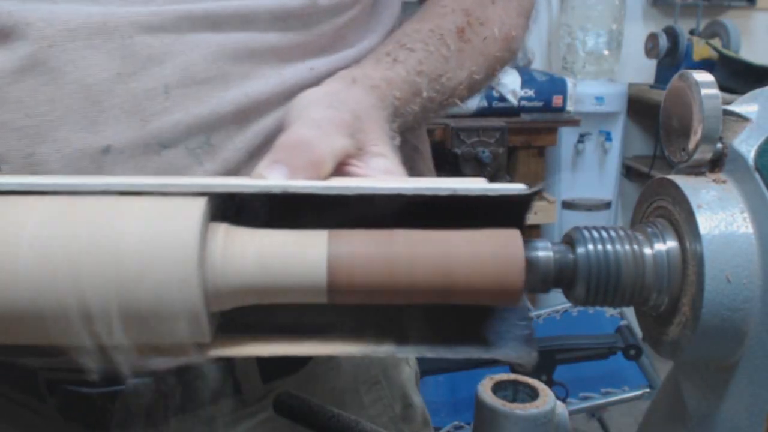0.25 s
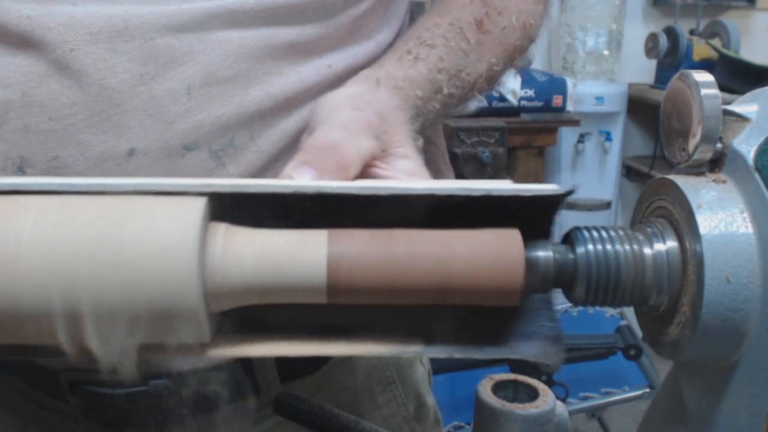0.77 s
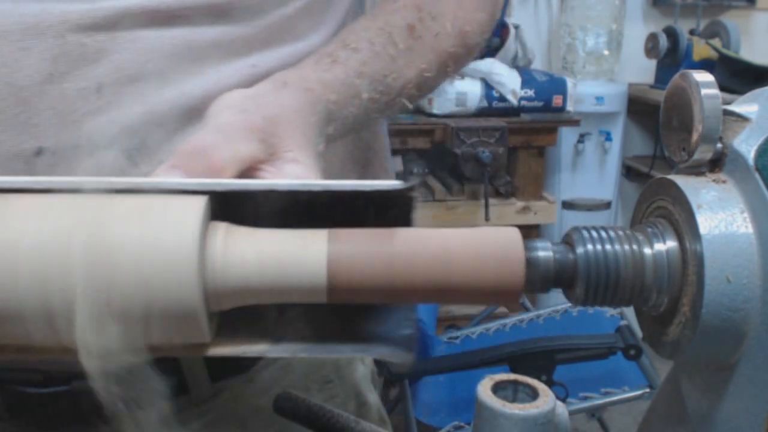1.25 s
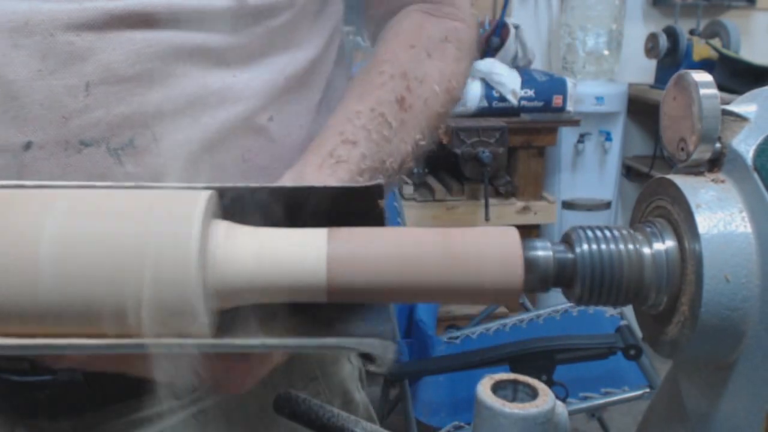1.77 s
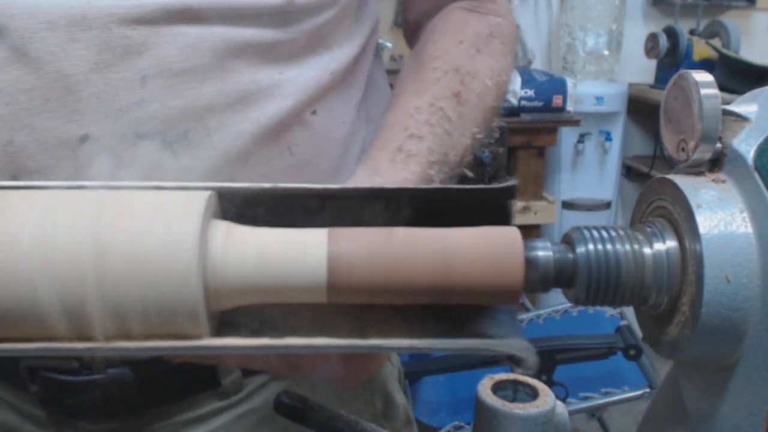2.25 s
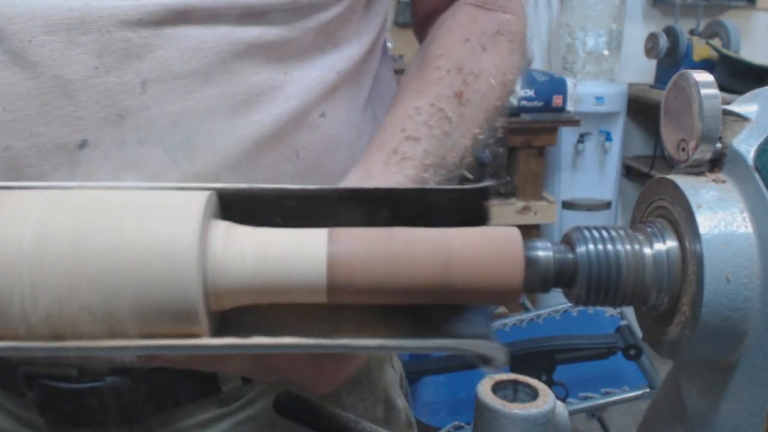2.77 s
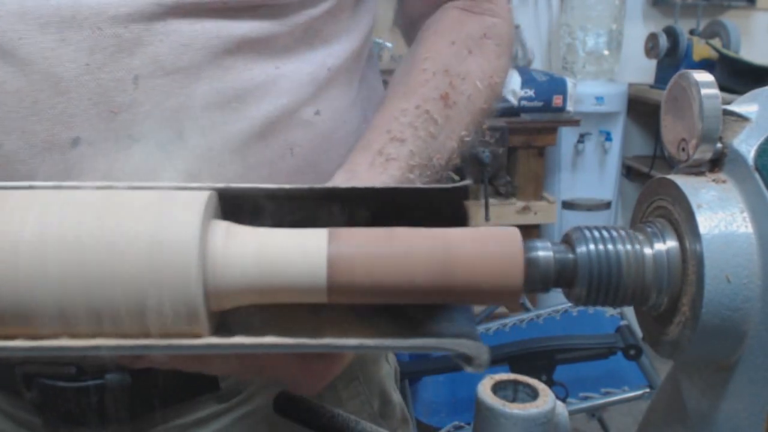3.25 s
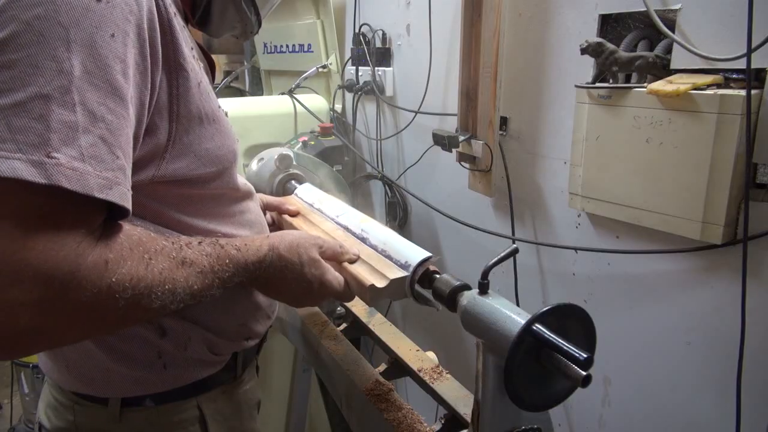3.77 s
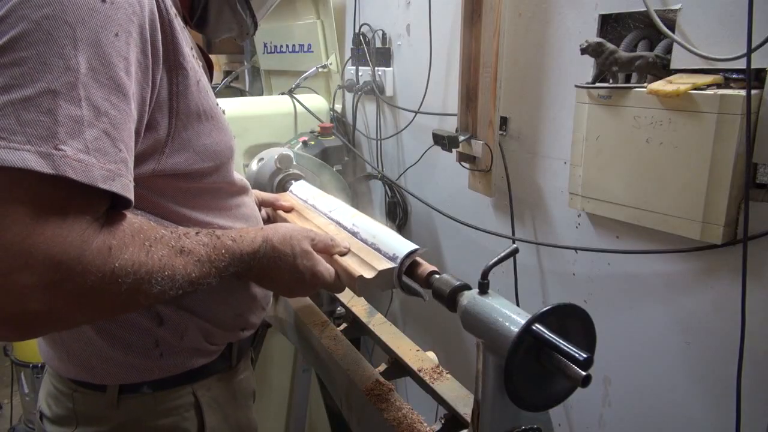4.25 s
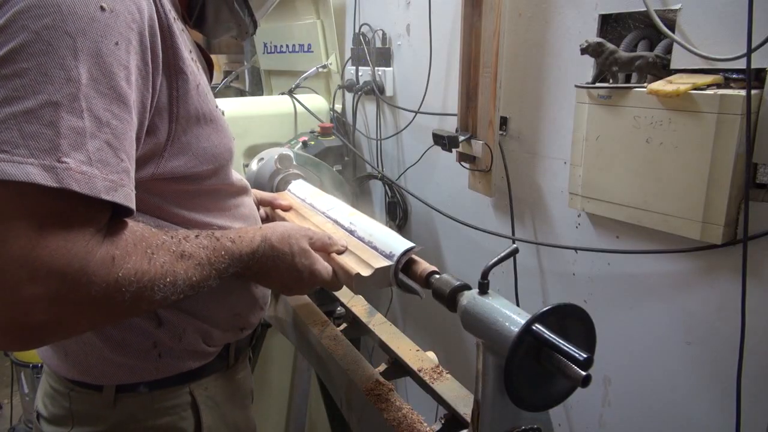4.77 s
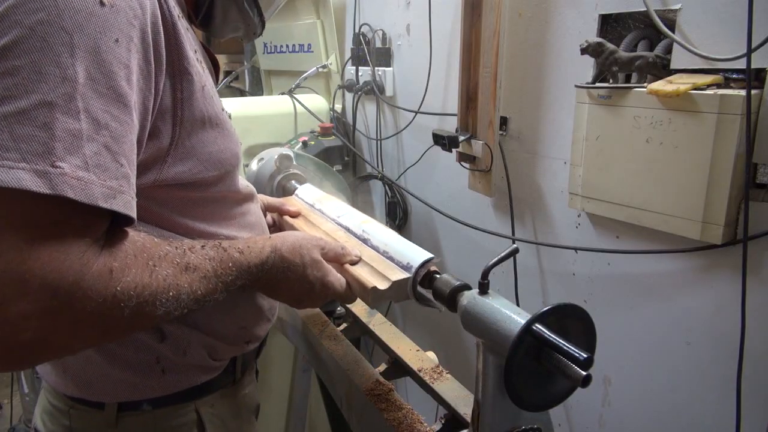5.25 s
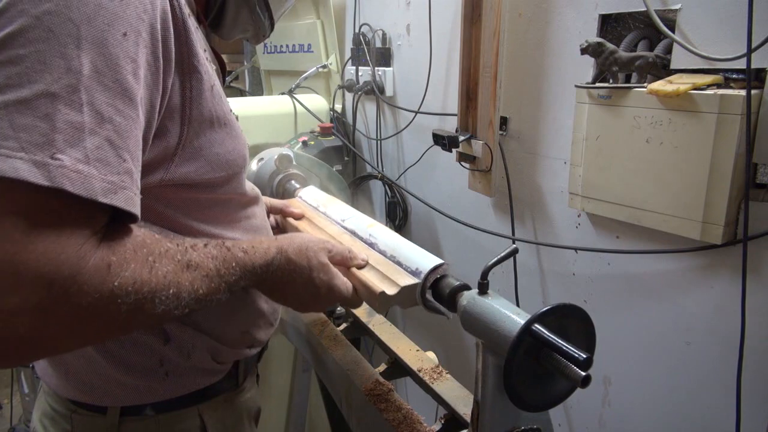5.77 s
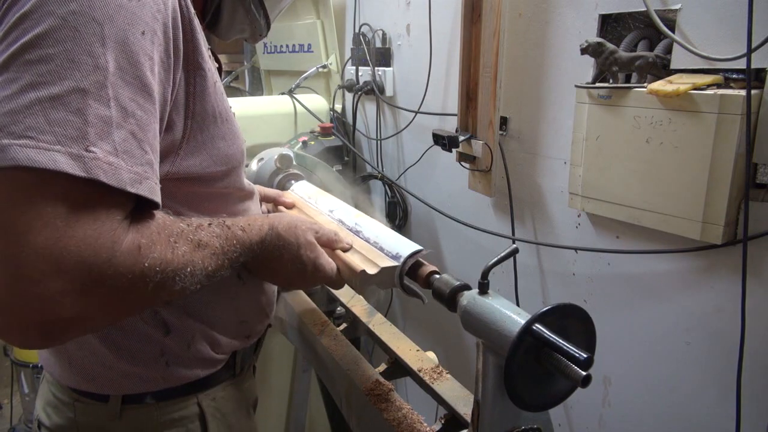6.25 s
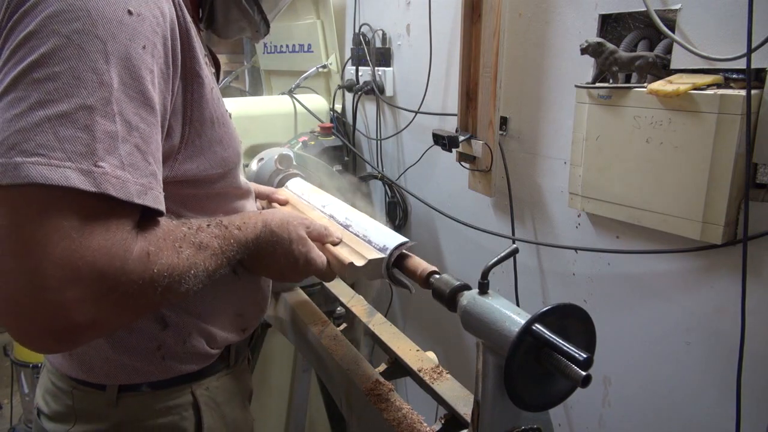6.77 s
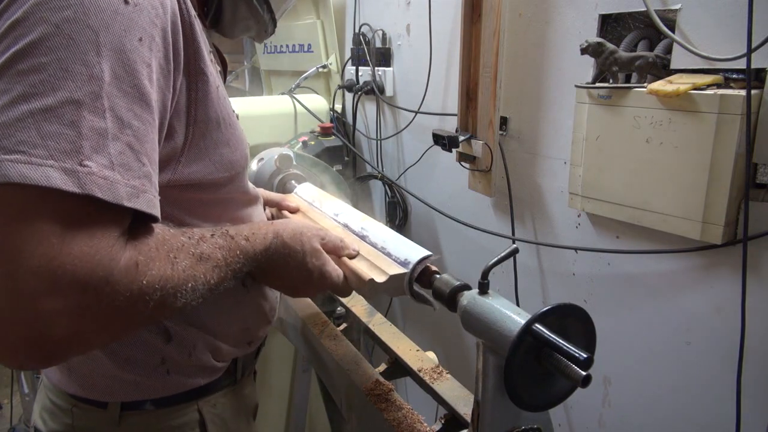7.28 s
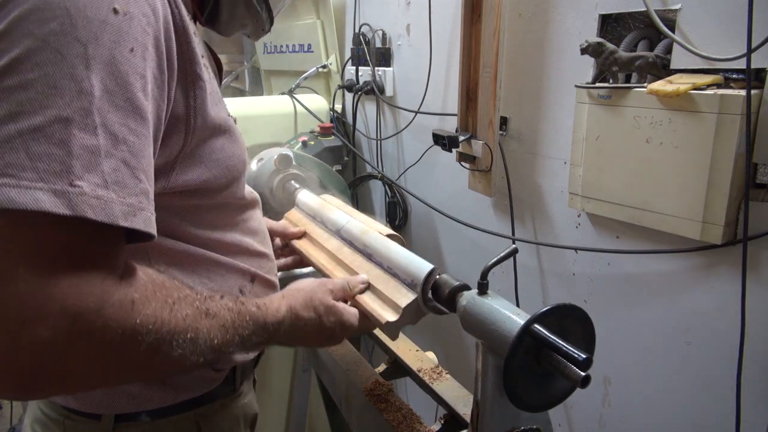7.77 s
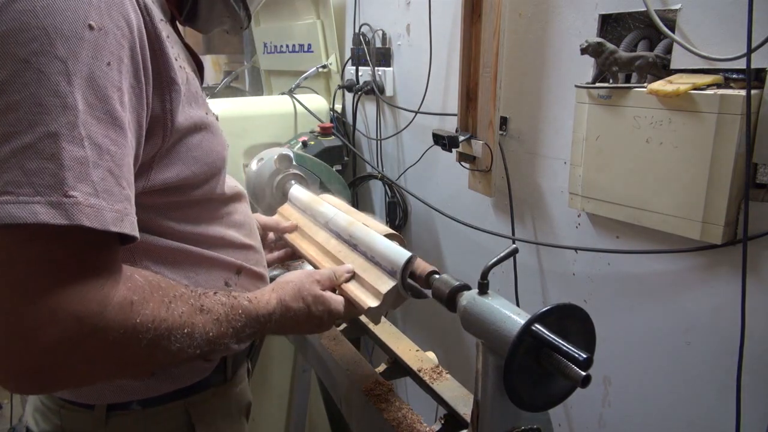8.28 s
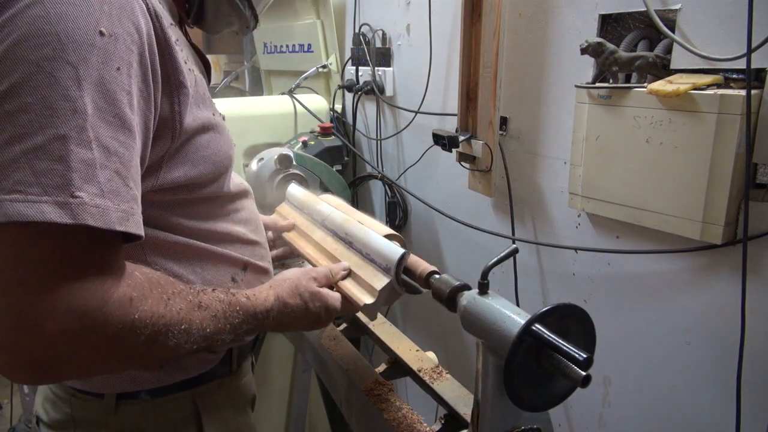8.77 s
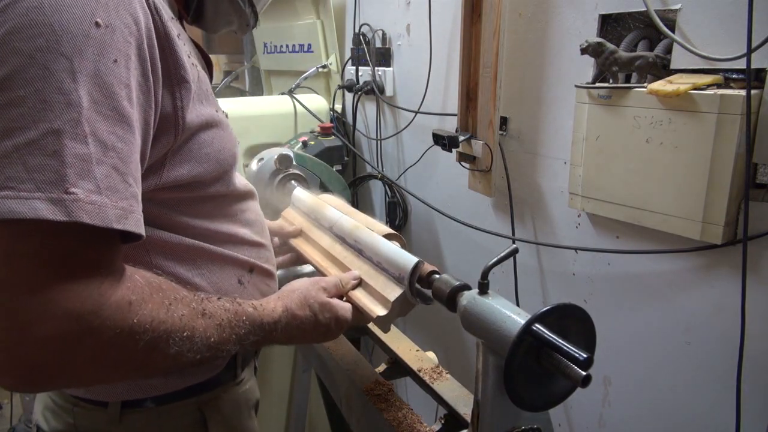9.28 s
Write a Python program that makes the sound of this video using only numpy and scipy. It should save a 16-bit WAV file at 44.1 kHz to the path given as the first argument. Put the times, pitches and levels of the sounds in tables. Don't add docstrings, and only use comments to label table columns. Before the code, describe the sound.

A sheet of abrasive is pressed along a wooden cylinder spinning on a lathe. The bright, gritty hiss never stops, pulsing about fourteen times a second and swelling or easing slightly as the hand slides. Faint papery rings and a dull woody tone sit inside it, with weak bed rumble and motor hum far below. Close, dry, nearly mono, thin in the bass and without extreme treble.

```python
import sys
import numpy as np
from scipy import signal
from scipy.fft import rfft, irfft, next_fast_len
from scipy.io import wavfile
from scipy.ndimage import uniform_filter1d, map_coordinates

SR = 44100
rng = np.random.default_rng(int(sys.argv[2]) if len(sys.argv) > 2 else 0)


def linear_from_db(decibels):
    return 10 ** (np.asarray(decibels, float) / 20)


def inscribe(sig):
    pcm = np.round(np.clip(np.atleast_2d(sig).T, -1, 1) * 32767)
    wavfile.write(sys.argv[1], SR, pcm.astype(np.int16))


N = 419832
LOOP_S = 6.08
LENGTH = round((LOOP_S + 0.25) * SR)
TIME = np.arange(LENGTH) / SR


def unit(x):
    return x / np.sqrt(np.mean(x ** 2) + 1e-20)


def curves(rows):
    s, *columns = np.transpose(rows)
    return [np.interp(TIME, s, column) for column in columns]


def wobble(rate):
    points = rng.standard_normal(int(LENGTH * rate / SR) + 4)
    return map_coordinates(points, [TIME * rate])


def bell(x, centre, half):
    return np.exp(-0.5 * ((x - centre) / half) ** 2)


def rush(source, spectrum, rings, patchy_db, size=1024):
    hz, t, z = signal.stft(source, SR, nperseg=size, noverlap=size - 512)
    patches = uniform_filter1d(rng.standard_normal(z.shape), size=2, axis=0)
    patches = uniform_filter1d(patches, size=10, axis=1)
    s, half_s, centre_hz, half_hz, db = np.transpose(rings)[:, :, None]
    ring_db = 1.35 * (db * bell(hz, centre_hz, half_hz)).T @ bell(t, s, half_s)
    gain_db = patchy_db * unit(patches) + ring_db
    x = signal.istft(z * linear_from_db(gain_db), SR, nperseg=size, noverlap=size - 512)[1][:LENGTH]
    f, level_db = np.transpose(spectrum)
    grid = np.fft.rfftfreq(LENGTH, 1 / SR)
    colour_db = np.interp(np.log(grid + 1), np.log(f + 1), level_db, left=-120)
    return unit(irfft(rfft(x) * linear_from_db(colour_db), LENGTH))


# (t/s, pressure level/dB, bite of the grit level/dB, sliding speed level/dB)
HAND = [(0, 1.5, 1, .3), (.4, -3, 0, 2), (.7, -6, -2, 2.4), (.93, -2.5, -1, -1), (1, 0, 1, -0.5),
        (1.5, 3, 0, -1.5), (2, 2, 0, .3), (2.3, 1, -0.5, 2.2), (2.68, -1.5, -2, 1), (2.9, 2.5, -0.5, -1.5),
        (3.45, 3, 0, -0.1), (3.6, -2, 0, 0), (3.85, -1.5, 1, 0), (4.5, -3, -0.5, 0), (4.95, -1, .5, -.5),
        (5.7, 2, 2, -1.5), (6, 3.5, 0.5, 0), (6.15, 3, 0, 0)]
# (level/dB, dB per dB of pressure, of bite, of sliding)
LAYERS = dict(hiss=(-26.5, 0.06, 0.16, 0.63), rasp=(-33, 0.01, 1.55, 0.08), scrape=(-39.5, .5, 0.45, 0.7),
          wood=(-51, 0.76, -0.16, 0.1), rumble=(-60.5, .8, -0.25, 0.22))


def level(layer):
    hand = np.array(curves(HAND))
    db, *follows = LAYERS[layer]
    return db + np.dot(follows, hand - hand.mean(axis=1, keepdims=True))


# (f/Hz, rms level/dB)
MOTOR_TONES = [(74.5, -79.5), (150.7, -71), (205.5, -78), (301.5, -77)]


def motor():
    tones = np.zeros(LENGTH)
    for hz, db in MOTOR_TONES:
        size = linear_from_db(0.8 * wobble(3))
        drift = 0.3 * wobble(5)
        tones += np.sqrt(2) * linear_from_db(db) * size * np.sin(2 * np.pi * hz * TIME + drift)
    return tones


# (t/s, half length/s, f/Hz, level/dB)
BED_NOTES = [
    (5.55, .35, 50, 12),
    (3.1, .9, 72, 4),
    (2, 0.32, 190, 4),
    (5.75, .12, 190, 5),
]


def bed_rings():
    return [(s, half_s, hz, 0.067 * hz, db) for s, half_s, hz, db in BED_NOTES]


# (t/s, half length/s, f/Hz, level/dB)
PIECE_NOTES = [(0.135, .6, 314, 5.5), (0.136, .9, 437, -2), (2.37, 1, 755, 1.5), (2.455, 0.76, 302, 2.5),
               (3.8, 1, 1440, -2), (5.73, 0.28, 1040, 3.5), (5.99, 0.14, 370, 4.5), (6, .9, 750, 2),
               (6.049, 0.79, 312, 4.5), (6.21, .9, 427, -2), (2.45, .1, 295, 5.5), (1.3, .2, 340, 2.5),
               (.2, .1, 460, -4), (4.6, .8, 260, -2)]


def piece_rings():
    half_hz = 22
    return [(s, half_s, hz, half_hz, db) for s, half_s, hz, db in PIECE_NOTES]


# (f/Hz, level/dB per Hz)
RUMBLE = [(15, -21), (42, -14.5), (54, -3), (64, -5), (74, -2.5), (88, -9), (112, -1.5), (135, -8.5),
          (180, -12), (210, -6.5), (255, -10), (305, -5), (430, -8), (580, -29.5)]


def bed_rumble():
    rings = piece_rings() + bed_rings()
    return linear_from_db(level("rumble")) * rush(rng.standard_normal(LENGTH), RUMBLE, rings, patchy_db=1.0, size=4096)


def lathe():
    return bed_rumble() + motor()


# (t/s, half length/s, lobes a turn, depth level/dB, lead/cycles)
HIGH_SPOTS = [(0.793, .6, 1, 0.9, 0.24), (2.514, .4, 1, 1.17, 0.42), (4.098, 0.36, 1, 1.4, 0.71),
              (5.4, 0.47, 1, 1, 0.64), (.6, 0.54, 2, 1, 0.13), (1.603, .3, 2, 0.4, .45),
              (2.797, 0.33, 2, 0.8, .45), (4.404, 0.58, 2, 1, 0.27), (5.507, 0.26, 2, 1.2, 0.11),
              (0.505, .4, 3, .5, .5), (1.295, .2, 3, 1, .37), (1.897, .3, 3, 1.25, 0.76),
              (2.899, 0.44, 3, 0.5, .62), (4.103, 0.33, 3, 0.5, 0.84), (5.103, .2, 3, 0.9, 1),
              (5.506, .2, 3, 0.6, 0.53), (5.89, 0.17, 3, 1, .22)]


def throb():
    turns_per_s, drag_per_s = 13.95, 0.85
    heavy_from_s, heavy_to_s, sag_s = 4.55, 5.92, 0.17
    inside_s = np.minimum(TIME - heavy_from_s, heavy_to_s - TIME)
    heavy = np.clip(0.5 + inside_s / sag_s, 0, 1)
    turns = np.cumsum(turns_per_s - drag_per_s * heavy) / SR
    total_db = np.zeros(LENGTH)
    for s, half_s, lobes, db, lead in HIGH_SPOTS:
        total_db += db * bell(TIME, s, half_s) * np.cos(2 * np.pi * (round(lobes) * turns + lead))
    return total_db


# (t/s, f/Hz, level/dB)
GRIP_RINGS = [(.41, 5800, -1), (.74, 4740, 1), (0.751, 7900, 0), (.84, 6840, 2.5), (1.67, 1920, -0.5),
              (1.78, 8800, 1.7), (2.2, 5340, 0.9), (2.9, 5470, 0.2), (2.36, 1630, 3), (3.11, 3820, -1.5),
              (3.41, 2870, 1.5), (3.75, 8560, 0.4), (4.06, 6970, 2), (4.61, 1760, 2), (5.39, 6000, -1),
              (6, 6680, 1), (2.4, 2770, 0.7), (2.7, 4380, 0.5)]
# (t/s, f/Hz, level/dB)
EDGE_FLUTTERS = [(.53, 1870, 2), (1.76, 2290, 3.5), (1.76, 4010, 3), (2.649, 5560, 3.2), (2.67, 7480, 4),
                 (2.831, 4470, 0.5), (3.29, 5240, 2.4), (3.75, 4150, 2), (3.75, 4430, 2.5),
                 (3.949, 2400, 3), (4.67, 8620, 3.5), (5.07, 2460, 4), (5.82, 3040, 2), (.3, 4060, -1),
                 (3.72, 3210, 1.5), (3.75, 3550, 1.5), (5.15, 4300, 1), (5.55, 3190, 1.5), (5.3, 2160, 1.5)]


def sheet_rings():
    grip = [(s, 0.9, hz, 177, db) for s, hz, db in GRIP_RINGS]
    edge = [(s, 0.2, hz, 100, db) for s, hz, db in EDGE_FLUTTERS]
    return grip + edge


def grit(spread_db):
    return rng.standard_normal(LENGTH) * linear_from_db(spread_db * wobble(900))


# (f/Hz, level/dB per Hz)
HISS = [(2940, -29), (5000, -13), (6700, -10), (8070, -11), (8950, -11.5), (9440, -11.5), (12300, -32),
        (20800, -120)]
RASP = [(1760, -35.5), (3000, -5.5), (3710, -5), (4200, -2), (5000, -5.5), (6500, -8.5), (11000, -120)]
SCRAPE = [(820, -46.5), (1400, -15), (1540, -9), (1810, -4.5), (2020, -4.5), (2740, -1), (3000, -10.5),
          (3900, -15), (6600, -120)]
WOOD = [(240, -54.5), (400, -23), (437, -20.5), (557, -13.5), (662, -13.5), (764, -11.5), (887, -13),
        (964, -10), (1270, -12), (1500, -7.5), (1950, -25), (3300, -120)]


def sanding():
    sheet = sheet_rings()
    contact_db = 0.82 * throb() + 0.15 * wobble(7.1) + 0.33 * wobble(45)
    grains = grit(spread_db=0.5)
    hiss_db = level("hiss") + 0.78 * contact_db + 0.23 * wobble(30)
    hiss = linear_from_db(hiss_db) * rush(grains, HISS, sheet, patchy_db=1.46)
    rasp_db = level("rasp") + 1.38 * contact_db + 0.42 * wobble(6)
    rasp = linear_from_db(rasp_db) * rush(grains, RASP, sheet, patchy_db=1.7)
    scrape_db = level("scrape") + 0.48 * contact_db + 0.4 * wobble(5.2)
    scrape = linear_from_db(scrape_db) * rush(grains, SCRAPE, sheet, patchy_db=0.4)
    wood_db = level("wood") + 0.38 * contact_db
    wood = linear_from_db(wood_db) * rush(grit(spread_db=0.0), WOOD, piece_rings(), patchy_db=0.5, size=2048)
    return hiss + rasp + scrape + wood


def workshop(x, wet_db, t60, count=12):
    t = np.arange(SR // 5) / SR
    place = TIME / TIME[-1] * count
    wet = np.zeros(LENGTH)
    for k in range(count + 1):
        tail = rng.standard_normal(len(t)) * linear_from_db(-60 * t / t60) * (t > 0.003)
        share = np.cos(np.pi / 2 * np.clip(place - k, -1, 1))
        wet += share * signal.fftconvolve(x, tail / np.linalg.norm(tail))[:LENGTH]
    return (x + linear_from_db(wet_db) * wet) / np.hypot(1, linear_from_db(wet_db))


# (t/s, half length/s, side level under the middle/dB)
SPREAD = [(0.757, 0.035, -32), (1.358, 0.052, -21), (3.028, 0.072, -16.5), (5.364, 0.039, -19.5),
          (5.546, 0.039, -18.5)]


def widened(middle):
    opening = np.zeros(LENGTH)
    for s, half_s, db in SPREAD:
        opening += linear_from_db(db) * np.cos(np.pi / 2 * np.clip((TIME - s) / half_s, -1, 1))
    side = opening * np.roll(middle, SR // 3)
    return np.array([middle + side, middle - side])


def looped(x):
    period = round(LOOP_S * SR)
    fade = np.pi / 2 * np.clip(np.arange(LENGTH - period) / (0.056 * SR), 0, 1)
    again = x[..., :N - period].copy()
    again[..., :len(fade)] = np.sin(fade) * again[..., :len(fade)] + np.cos(fade) * x[..., period:]
    return np.concatenate([x[..., :period], again], axis=-1)


def scene():
    middle = workshop(sanding(), wet_db=-16, t60=0.12) + lathe()
    return looped(widened(middle))


def top_cut(x):
    return signal.sosfilt(signal.butter(12, 9780, fs=SR, output="sos"), x)


def record(dry):
    top_hz, cliff_db_per_hz = 9625, 0.42
    size = next_fast_len(N + 8192)
    over_hz = np.clip(np.fft.rfftfreq(size, 1 / SR) - top_hz, 0, 400)
    kept = irfft(rfft(dry, size) * linear_from_db(-cliff_db_per_hz * over_hz), size)[:, :N]
    return top_cut(kept)


dry = scene()
out = record(dry)
inscribe(out)
```